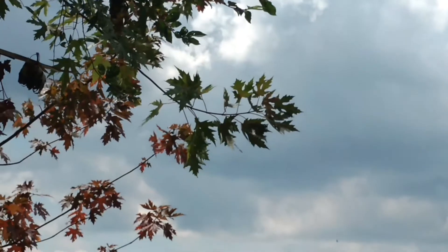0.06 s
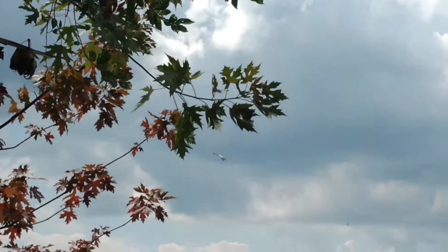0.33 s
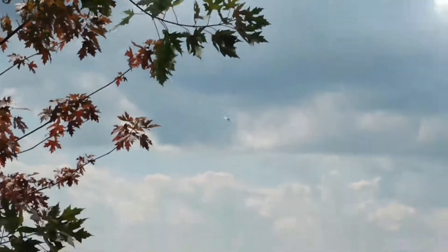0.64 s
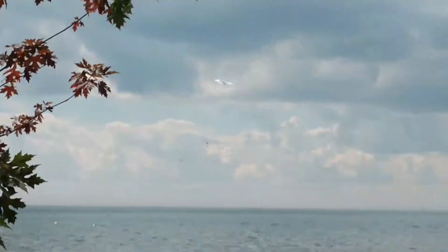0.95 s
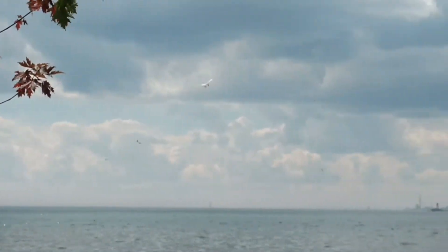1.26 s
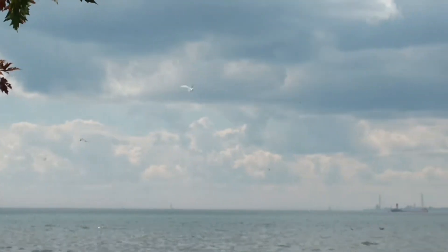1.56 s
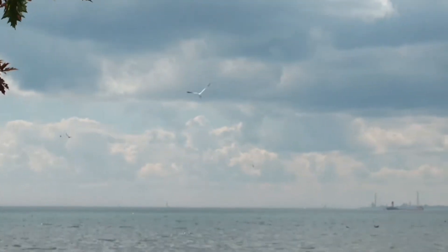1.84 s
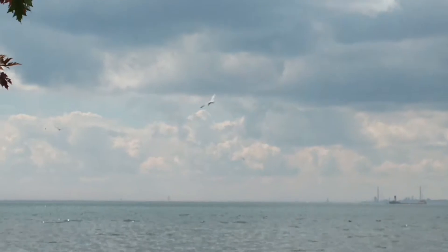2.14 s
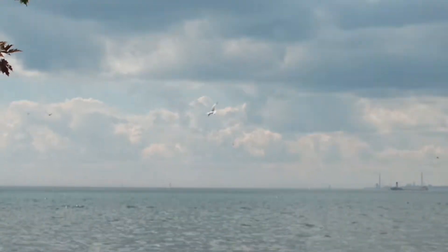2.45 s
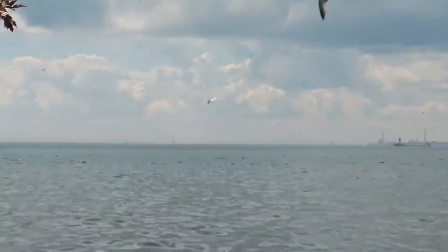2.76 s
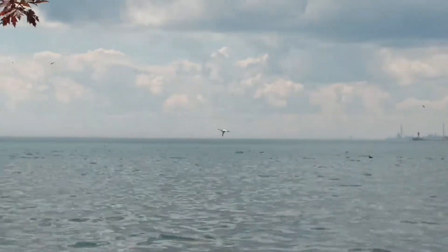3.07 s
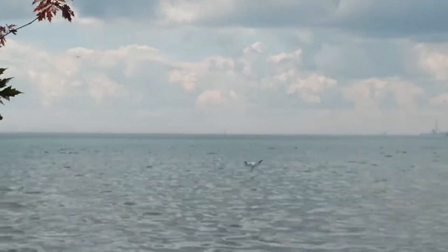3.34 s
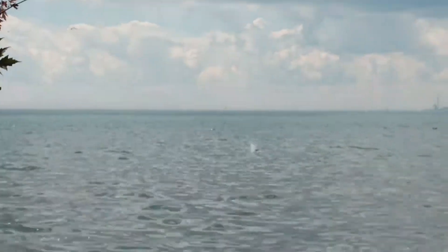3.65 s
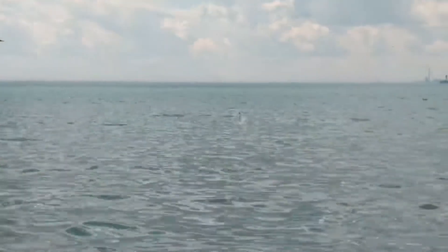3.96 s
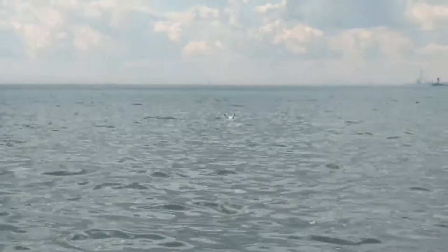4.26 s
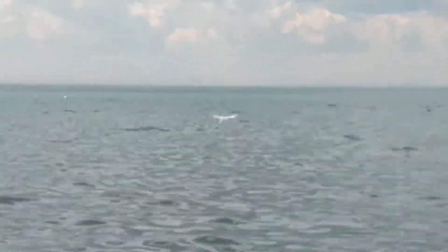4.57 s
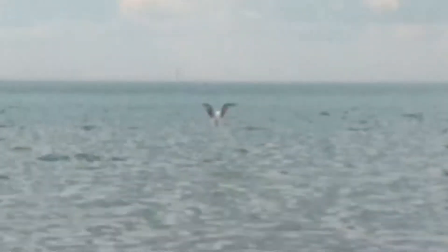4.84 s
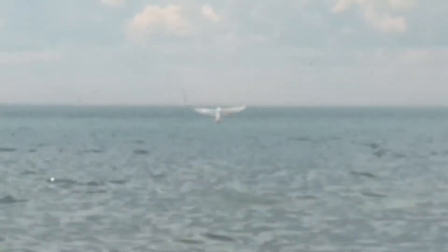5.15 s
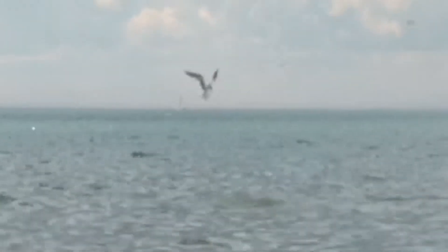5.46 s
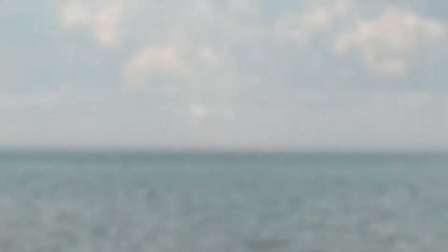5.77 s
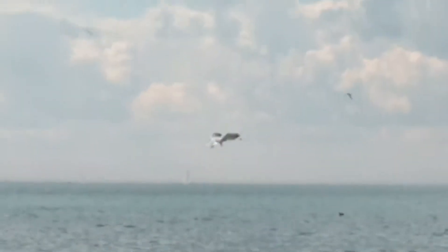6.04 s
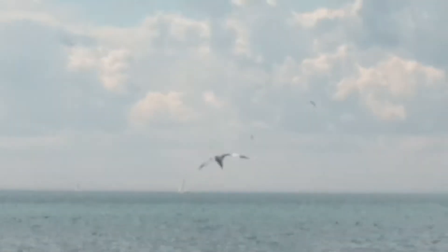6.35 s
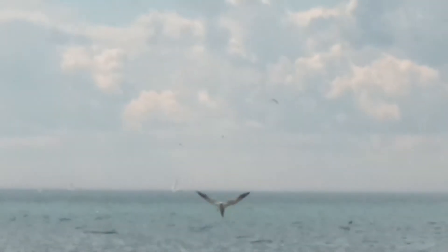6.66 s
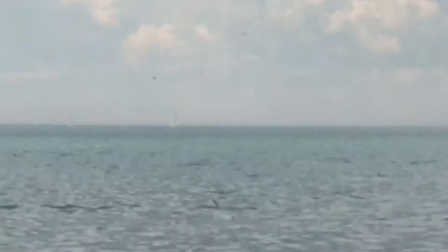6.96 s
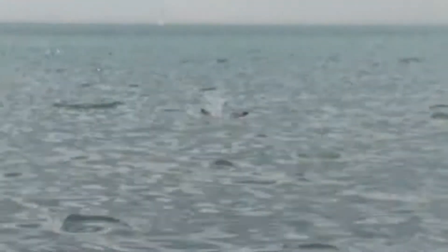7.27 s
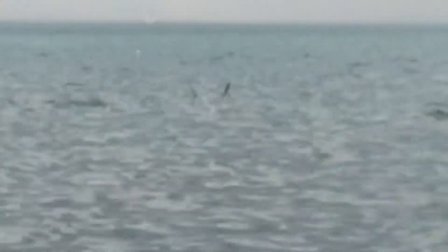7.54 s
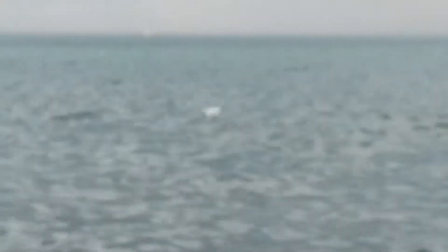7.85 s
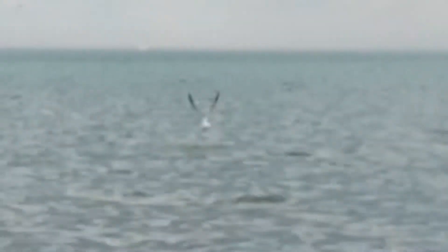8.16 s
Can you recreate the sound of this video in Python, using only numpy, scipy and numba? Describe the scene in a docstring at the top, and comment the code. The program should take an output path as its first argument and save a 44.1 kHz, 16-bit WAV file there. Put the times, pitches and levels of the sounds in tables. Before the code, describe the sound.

Small waves wash continuously against a lake shore, close to a hand-held phone microphone. Each one swells and drains with bubbling, fizzing spray and hollow gurgles, and now and then the water slaps shut with a sharp pop. Light wind buffets the microphone at times. Far off, a motor drones faintly and a bird gives two thin peeps in the first half. The wash eases midway, then builds again.

```python
"""Small lake waves wash against the shore, close to a hand-held phone, in a light breeze.
Each wave is a cloud of ringing bubbles, with fizzing spray above it and hollow gurgles below.
Wind buffets the microphone ports, a motor drones far across the water, a distant bird peeps twice.
Now and then a wave slaps shut on a pocket of air; on the loudest peaks the phone's gain control
ducks and creeps back."""
import sys
import numpy as np
from scipy import signal
from scipy.fft import rfft, irfft
from scipy.io import wavfile
from scipy.ndimage import uniform_filter1d, minimum_filter1d, map_coordinates
from numba import njit

SR = 44100
rng = np.random.default_rng(int(sys.argv[2]) if len(sys.argv) > 2 else 0)


def wav_record(signal):
    """Record a signal, one row per channel, as 16-bit PCM in the file named by sys.argv[1]."""
    frames = np.transpose(np.atleast_2d(signal))
    bounded = np.clip(frames, -1, 1)
    # unit amplitude maps onto the largest positive 16-bit level
    quanta = np.round(bounded * 32767).astype(np.int16)
    wavfile.write(sys.argv[1], SR, quanta)


N = 362061
TIME = np.arange(N) / SR
FREQ = np.maximum(np.fft.rfftfreq(N, 1 / SR), 1)

# waves running up the shore: (crest time [s], build-up [s], wash [dB], spray [dB], gurgle [dB])
WAVES = [(0.03, 0.3, -25, -35.5, -39.5), (0.38, 0.28, -29.5, -31, -40), (0.87, 0.14, -19.5, -27, -43),
         (1.06, 0.078, -26, -32, -45), (1.30, 0.17, -19, -25.5, -37), (1.44, 0.065, -19, -28.5, -35),
         (1.73, 0.03, -43, -32, -36), (2.00, 0.27, -19, -26, -41), (2.48, 0.072, -25, -30, -40),
         (2.98, 0.3, -19.5, -26.5, -38), (3.22, 0.16, -26, -29.5, -38), (3.74, 0.19, -26.5, -33, -35.5),
         (4.22, 0.091, -32, -34, -47), (4.569, 0.11, -25.5, -31.5, -37.5), (5.02, 0.11, -31, -38, -48.5),
         (5.92, 0.2, -24.5, -32, -57), (6.26, 0.23, -23, -32, -46), (6.52, 0.11, -25.5, -33, -36),
         (6.70, 0.082, -21.5, -27.5, -47), (7.05, 0.72, -21.5, -28, -35.5),
         (7.30, 0.17, -27.5, -31.5, -38.5), (7.80, 0.33, -21.5, -28, -56), (8.001, 0.035, -15.5, -22, -33)]


def undb(db):
    """Decibels to gain."""
    return 10 ** (np.asarray(db) / 20)


def unit(x):
    """Scale to rms 1."""
    return x / np.sqrt(np.mean(x ** 2))


def gain_curve(points):
    """Gain at every frequency from (Hz, dB) points, level beyond the ends."""
    hz, db = np.transpose(points)
    return undb(np.interp(np.log(FREQ), np.log(hz), db))


def band_curve(points):
    """The gain curve, falling 12 dB an octave beyond its ends."""
    low_hz, high_hz = points[0][0], points[-1][0]
    skirts = np.minimum(FREQ / low_hz, 1) * np.minimum(high_hz / FREQ, 1)
    return gain_curve(points) * skirts ** 2


def high_pass(x, hz):
    """Fall of 12 dB an octave below hz."""
    return signal.sosfilt(signal.butter(2, hz, "highpass", fs=SR, output="sos"), x)


def wander(rate_hz):
    """Smooth random motion of rms 1, changing about rate_hz times a second."""
    knots = rng.standard_normal(2048)
    return unit(map_coordinates(knots, [TIME * rate_hz], order=3, mode="wrap"))


@njit
def ring_bubbles(start_s, hz, cycles, amplitude, rise):
    """Each bubble is a sine that decays by 1/e in its cycles while its pitch gains the fraction rise."""
    out = np.zeros(N)
    for k in range(len(start_s)):
        first, life = int(start_s[k] * SR), cycles[k] * SR / hz[k]
        phasor = amplitude[k] + 0j
        pole = np.exp(2j * np.pi * hz[k] / SR - 1 / life)
        glide = np.exp(2j * np.pi * hz[k] / SR * rise[k] / life)
        for i in range(max(first, 0), min(first + int(5 * life), N)):
            out[i] += phasor.imag
            phasor *= pole
            pole *= glide
    return out


def bubble_cloud(low_hz, high_hz, cycles, spread_db, rise, count):
    """A crowd of bubbles, scattered in time, pitch, damping and strength."""
    when, pitch, sustain, polarity = rng.random((count, 4)).T
    strength = undb(spread_db * np.minimum(rng.standard_normal(count), 2.2))
    hz = low_hz * (high_hz / low_hz) ** pitch
    amplitude = strength * np.sign(polarity - .5) * np.sqrt(hz / low_hz)
    return ring_bubbles(when * N / SR, hz, cycles * (.5 + sustain), amplitude, np.full(count, rise))


def water(colour, blur_db, **bubbles):
    """Near bubbles over the noisy blur of far ones, as the two microphone ports hear them."""
    # the shore is wide, so short wavelengths reach the ports unlike: (frequency [Hz], side/mid [dB])
    shore_width = [(150, -28), (330, -20), (700, -11.5), (1100, -0.5), (2000, 9.5), (3000, -4.5), (4300, 1),
                   (9000, 1), (15000, 0.5)]
    width = gain_curve(shore_width)
    near = np.array([unit(bubble_cloud(**bubbles)) for _ in range(2)])
    far = undb(blur_db) * rng.standard_normal((2, N))
    mid, side = rfft(near + far) * band_curve(colour)
    ports = np.array([mid + width * side, mid - width * side]) / np.sqrt(1 + width ** 2)
    return unit(irfft(ports, N))


def surge(crest_db, lapping_db, drain_s):
    """Each wave's level builds to its crest and drains by 1/e in drain_s, over the steady lapping."""
    power = undb(lapping_db) ** 2
    for (crest_s, build_s, *_), db in zip(WAVES, crest_db):
        age = TIME - crest_s
        envelope = np.exp(np.minimum(age / build_s, -age / drain_s))
        power = power + (undb(db) * envelope) ** 2
    return np.sqrt(power)


def waves():
    """Close by, each run-up breaks into quick splashes that stir the wash and throw spray."""
    # spectra of the water's three layers: (frequency [Hz], relative level [dB])
    wash_colour = [(150, -27), (300, -8.5), (460, -9.5), (700, -2), (1000, -1), (1400, -1.5), (1900, 0.44),
                   (2400, -3.5), (3000, -9.5), (5000, -61)]
    spray_colour = [(1500, -60), (2700, -2), (3700, -0.5), (4500, -1.5), (5200, -5.5), (6300, -9),
                    (8000, -12), (10500, -12.5), (12000, -18), (15000, -21)]
    gurgle_colour = [(50, -32), (110, -2), (170, -8), (230, -6), (330, -1.5), (480, -1.5), (900, -5.5)]
    _, _, wash_db, spray_db, gurgle_db = np.transpose(WAVES)
    splashes = wander(rate_hz=32)
    wash = water(wash_colour, blur_db=7.0, low_hz=455.3, high_hz=2809,
                 cycles=6.95, spread_db=3.0, rise=0.036, count=6000)
    spray = water(spray_colour, blur_db=7.0, low_hz=2412, high_hz=14320,
                  cycles=9.9, spread_db=7.5, rise=0.023, count=12000)
    gurgle = water(gurgle_colour, blur_db=9.5, low_hz=154.7, high_hz=480.7,
                   cycles=4.44, spread_db=3, rise=0.03, count=500)
    wash *= surge(wash_db, lapping_db=-29.5, drain_s=0.37)
    spray *= surge(spray_db, lapping_db=-37.5, drain_s=0.37)
    gurgle *= surge(gurgle_db, lapping_db=-41, drain_s=0.27)  # the hollows empty sooner
    wash *= undb(0.39 * splashes + 0.22 * wander(rate_hz=57))
    spray *= undb(0.63 * splashes + 1.17 * wander(rate_hz=41))
    gurgle *= undb(0.46 * splashes)
    return wash + spray + gurgle


def wind(breeze_db=-64.5, flutter_db=3):
    """Eddies buffet each microphone port on its own; gusts swell and die over a light breeze."""
    # gusts and short buffets on the ports: (time [s], half length [s], strength [dB])
    gusts = [(0.11, 0.028, -46), (0.502, 0.3, -44), (2.438, .02, -52), (3.15, 0.14, -63),
             (3.283, 0.014, -49), (3.56, .025, -52), (3.79, 0.03, -51), (4.39, 0.018, -41),
             (4.6, 0.26, -68), (5.163, 0.02, -47), (6.844, 0.017, -49), (7.1, 0.1, -60)]
    # spectrum of the eddies' rumble: (frequency [Hz], relative level [dB])
    eddy_colour = [(20, -8), (45, -1), (100, 6), (170, -21), (300, -18), (800, -8)]
    gust_power = sum(undb(db) ** 2 * np.exp(-((TIME - s) / half_s) ** 2) for s, half_s, db in gusts)
    strength = np.sqrt(undb(breeze_db) ** 2 + gust_power)
    eddies = unit(irfft(rfft(rng.standard_normal((2, N))) * band_curve(eddy_colour), N))
    return eddies * strength * undb(flutter_db * wander(rate_hz=21))


def far_motor(swell_db=1.5, waver=0.0062):
    """A motor drones faintly far across the water, one wavering note that comes and goes."""
    # the slow drift of its note: (time [s], pitch [Hz], level [dB])
    drift = [(0, 160.5, -53.5), (2.0, 163.2, -56), (3.4, 157.7, -50.5), (4.3, 168.6, -51), (5.2, 164, -54),
             (6.2, 164, -60.5), (7.1, 165.5, -50), (7.9, 160, -54.5)]
    s, hz, db = np.transpose(drift)
    pitch_hz = np.interp(TIME, s, hz) * (1 + waver * wander(rate_hz=13))
    level_db = np.interp(TIME, s, db) + swell_db * wander(rate_hz=6.8)
    phase = 2 * np.pi * np.cumsum(pitch_hz) / SR
    return unit(np.sin(phase)) * undb(level_db)


def near_bubbles(mean_rise=0.011, rise_spread=0.012, gain_db=-5.5, lag_spread_s=.00005):
    """Lone bubbles ring out of the wash along the shore; each glides its own way, most upward."""
    # from deep gulps to tiny spits: (time [s], pitch [Hz], relative peak [dB], decay [cycles])
    bubbles = [(0.079, 780, -4, 2.1), (0.141, 1600, -13, 4.6), (0.203, 3790, -12, 4),
               (0.346, 860, -11.5, 10), (0.384, 1240, -10, 3.6), (0.589, 785, -5.5, 1.4),
               (0.746, 5960, -8, 5), (0.827, 1180, -6.5, 7.1), (0.842, 3600, -6, 4.9),
               (0.863, 1360, -9, 6.8), (0.926, 287, -17.5, 5), (0.931, 3860, -11, 4.7),
               (0.974, 1190, -7, 6), (1.213, 1890, -11, 5), (1.267, 850, -7, 4.3), (1.299, 178, -16.5, 2.7),
               (1.426, 3050, -5, 5), (1.441, 1233, -4.5, 6.3), (1.4458, 3700, 3, 2.8),
               (1.444, 5950, -5, 5.2), (1.449, 1690, -5, 3.5), (1.459, 3730, -4, 5), (1.46, 229, -17, 5.5),
               (1.4658, 9160, -8.5, 8.2), (1.489, 1690, -2, 2.2), (1.498, 390, -13.5, 4.8),
               (1.541, 3580, -5, 3.9), (1.689, 1150, -11, 5.4), (1.700, 268, -16.5, 4.5),
               (1.736, 606, -5.5, 2.5), (1.7444, 8340, -7, 2), (1.7535, 11000, -3, .7),
               (1.838, 388, -15.5, 6), (1.938, 202, -16, 6), (1.9659, 9200, -36, 10), (1.966, 280, -18, 6),
               (1.994, 171, -15.5, 8), (2.045, 924, -2, 5.4), (2.096, 168, -18, 4.6),
               (2.224, 207, -22, 8.3), (2.331, 202, -21, 4.6), (2.519, 193, -23, 5.2),
               (2.556, 930, -11, 3.8), (2.703, 2070, -12, 5), (2.765, 2870, -8.5, 2.5),
               (2.967, 870, -7, 4.3), (3.008, 1440, -4.5, 3.8), (3.016, 11300, -5.5, 2.5),
               (3.025, 348, -20, 7.6), (3.179, 680, -8, 4), (3.558, 290, -17.5, 4),
               (3.692, 6170, -9.5, 3.4), (3.707, 10500, -8, 2.6), (3.707, 3095, -1.5, 1.5),
               (3.732, 206, -23, 8.9), (3.814, 275, -23, 6.8), (4.045, 1280, -4, 2.2),
               (4.211, 731, -8.5, 7.8), (4.218, 886, -10, 4.7), (4.213, 1620, -11.5, 3.5),
               (4.222, 1160, -8, 4), (4.258, 1060, -4, 3), (4.553, 2100, -15, 4), (4.584, 284, -25, 4.7),
               (4.622, 374, -18, 4.4), (4.669, 1540, -17, 4.4), (4.707, 386, -7, 1.3),
               (4.711, 169, -4, 0.95), (4.727, 1110, -10, 6), (4.752, 900, -9, 2), (4.778, 780, -8, 3),
               (4.774, 2730, -3, 3.6), (4.783, 3150, -11, 4), (4.890, 6030, -7, 1.8),
               (4.912, 1490, -9, 6.5), (4.996, 1150, -16, 5), (5.024, 4060, -11, 4), (5.28, 5900, -11, 1.5),
               (5.288, 895, -19, 7), (5.301, 1000, -12.5, 5.5), (5.312, 1150, -15, 6),
               (5.46, 790, -13, 0.72), (5.462, 340, -18, 2.4), (5.508, 620, -14.5, 4), (5.812, 1664, -9, 4),
               (6.308, 278, -19, 6.6), (6.379, 3780, -8, 4), (6.498, 1510, -11, 4.9),
               (6.514, 395, -8.5, 2.1), (6.5151, 8760, -10, 3.3), (6.519, 220, -12.5, 4.3),
               (6.572, 1810, -7, 4.4), (6.594, 350, -15, 4.2), (6.665, 243, -17.5, 6),
               (6.680, 850, -9, 5.7), (6.696, 3700, -5.5, 4.4), (6.705, 4170, -6, 5), (6.748, 542, -20, 13),
               (6.756, 1000, -8, 3.5), (6.797, 300, -15, 5.8), (6.825, 275, -12, 2.8),
               (6.863, 348, -8.5, 2.5), (6.8907, 9200, -13, 3.8), (6.914, 586, -8.5, 7.5),
               (6.965, 354, -22, 4.1), (7.094, 1143, -8.5, 3.3), (7.122, 545, -13, 4.6),
               (7.171, 1390, -11, 4.4), (7.197, 217, -15, 1.7), (7.427, 1474, -12.5, 6.9),
               (7.545, 1080, -8, 5), (7.572, 229, -25, 4), (7.588, 1896, -13, 5), (7.647, 1490, -11, 5),
               (7.8277, 3900, -8.5, 4.2), (7.838, 243, -14, 2.6), (7.872, 3900, -2, 4),
               (7.879, 3990, -3, 5), (7.890, 3830, -7, 4), (7.98, 1020, -4, 5.6), (7.9875, 6650, 6, 2.4),
               (7.992, 225, -9, 3.2), (8.005, 6680, 3, 4)]
    s, hz, db, cycles = np.transpose(bubbles)
    glide, bearing = rng.standard_normal((len(s), 2)).T
    rise = mean_rise + rise_spread * glide
    lag_s = bearing * lag_spread_s  # a bubble off to one side reaches that port first
    return np.array([ring_bubbles(s + port * lag_s / 2, hz, cycles, undb(db + gain_db), rise)
                     for port in (-1, 1)])


def slaps(crack_hz=4000, sag=-0.018, depth_octaves=2):
    """A closing air pocket gives a damped pop, the water's smack a crack; small pockets are thinner."""
    # water slapping shut on trapped air: (time [s], pitch [Hz], level [dB], decay [cycles],
    # crack against pop [dB], crack decay [s], gain at the left port, shaded by the phone's body [dB])
    pockets = [ (2.0144, 3670, 3.5, 6, -24, .002, -16), (3.9932, 1510, 8.5, 0.83, -20.5, 0.0044, -4.5),
               (3.9950, 680, 4.5, 0.59, -18, 0.0095, -2), (4.7045, 480, 20, 0.2, -41, .008, -13),
               (5.9626, 1410, -10, 1.4, -9, 0.0033, -22), (5.964, 4330, 8, 0.81, -9, 0.00088, -24),
               (7.1970, 387, 8, 0.37, -30, .004, -43), (7.8368, 1590, -6, 1.7, -17, 0.0048, -7),
               (7.8401, 750, -1.5, 2.1, -13, 0.0051, -1), (7.9682, 1300, 8, 5.1, -59, .006, -5), ]
    out, age = np.zeros((2, N)), TIME[:2048]
    soften = signal.butter(2, crack_hz, fs=SR, output="sos")
    for s, hz, db, cycles, crack_db, crack_s, shade_db in pockets:
        decay = age * hz / cycles
        pop = np.exp(-decay) * np.sin(2 * np.pi * hz * age * (1 + sag * decay / 2))
        noise = unit(signal.sosfilt(soften, rng.standard_normal(len(age))))
        crack = undb(crack_db) * noise * np.exp(-age / crack_s)
        slap = high_pass(pop + crack, hz / 2 ** depth_octaves)
        start = int(s * SR)
        out[:, start:start + len(age)] += undb([[db + shade_db], [db]]) * slap
    return out


def distant_bird():
    """Each peep from the distance is a pure whistle that swells and fades."""
    # thin peeps: (time [s], length [s], pitch [Hz], peak [dB])
    peeps = [(2.198, 0.19, 4800, -35), (3.534, 0.067, 4500, -33.5)]
    out = np.zeros(N)
    for s, length_s, hz, db in peeps:
        progress = np.clip((TIME - s) / length_s, 0, 1)
        out += undb(db) * np.sin(np.pi * progress) * np.sin(2 * np.pi * hz * TIME)
    return out


def scene():
    """Sound pressure at the phone's two microphone ports, held at the water's edge."""
    pockets = high_pass(near_bubbles() + slaps(), hz=167)  # small air pockets radiate little bass
    return waves() + pockets + wind() + far_motor() + distant_bird()


def stereo_pair(ports, mismatch_db=2.5, port_travel_s=.0004, cross_feed=.99):
    """Each channel is one port minus the delayed other; a bass lift restores what that cancels."""
    # the two channels differ a little in colour: (frequency [Hz], left minus right [dB])
    channel_tilt = [(120, 0), (750, 1.4), (1450, -1), (2000, 0), (2550, 0), (3000, -3), (3700, 0),
                    (4500, -3), (5000, -1), (6500, -2), (7600, -.5), (10000, 0), (14000, 2)]
    tilt = np.sqrt(gain_curve(channel_tilt))
    left, right = rfft(ports) * undb([[-mismatch_db], [mismatch_db]])
    phase_lag = 2 * np.pi * FREQ * port_travel_s
    cross = cross_feed * np.exp(-1j * phase_lag)
    lift = 1 / np.abs(1 - cross_feed * np.exp(-1j * np.minimum(phase_lag, np.pi)))
    channels = np.array([(left - cross * right) * tilt, (right - cross * left) / tilt])
    return irfft(lift * channels, N)


def gain_control(x, ceiling_db=-4.0, release_db_per_s=15):
    """A peak over the ceiling pulls the gain down in about a millisecond; it climbs back steadily."""
    peak_db = 20 * np.log10(np.abs(x).max(axis=0) + 1e-9)
    over_db = np.maximum(peak_db - ceiling_db, 0)
    climb_db = release_db_per_s * TIME
    gain_db = climb_db - np.maximum.accumulate(over_db + climb_db)
    held_db = minimum_filter1d(gain_db, size=32)
    smooth_db = uniform_filter1d(uniform_filter1d(held_db, size=48), size=24)
    return x * undb(smooth_db)


def record(dry):
    """The phone forms its stereo pair, rides the gain, and cuts the rumble and the top."""
    sound = high_pass(gain_control(stereo_pair(dry)), hz=45)
    top_cut = signal.ellip(8, .2, 70, 15500, fs=SR, output="sos")  # steep above 15.5 kHz
    return signal.sosfilt(top_cut, sound)


dry = scene()
out = record(dry)
wav_record(out)
```